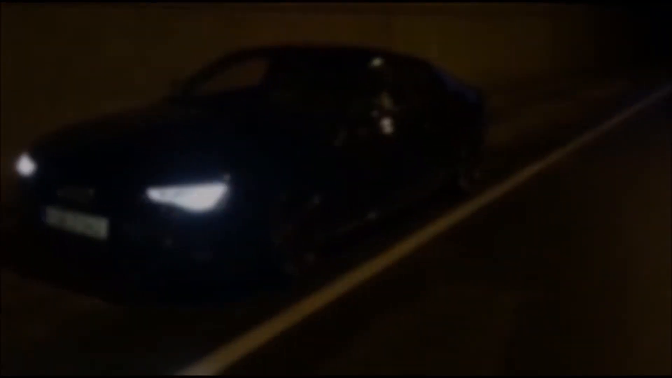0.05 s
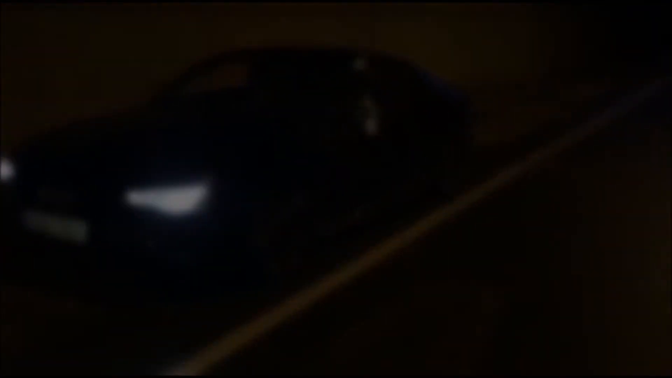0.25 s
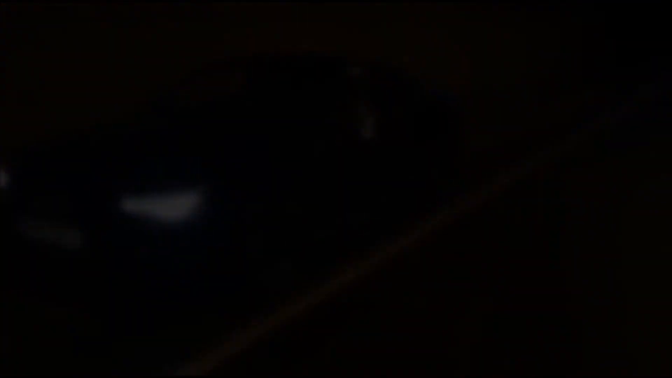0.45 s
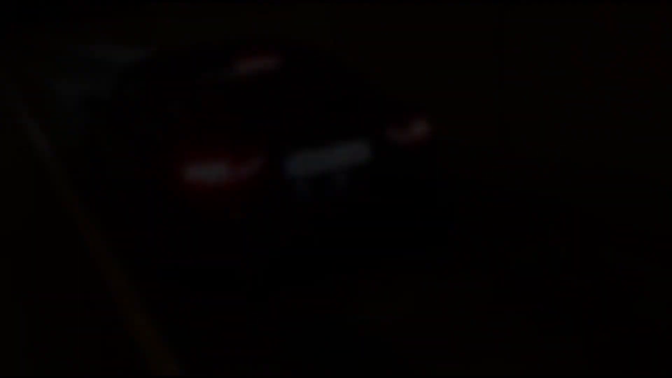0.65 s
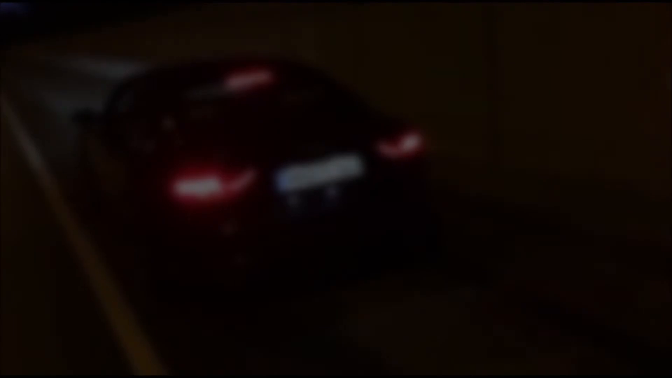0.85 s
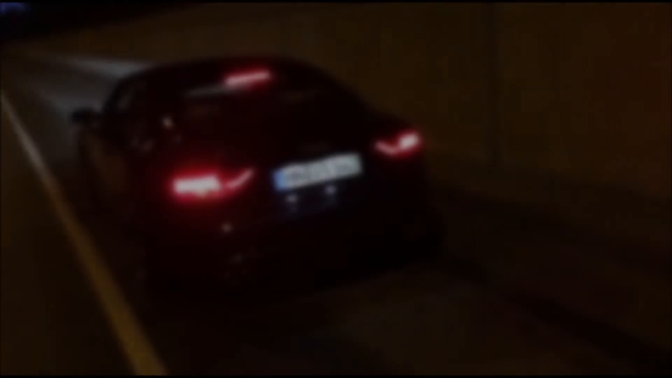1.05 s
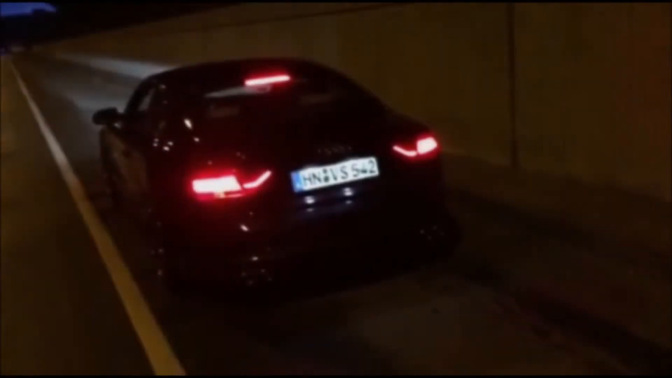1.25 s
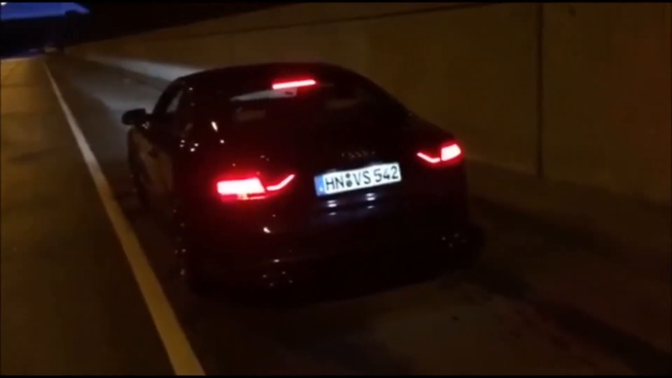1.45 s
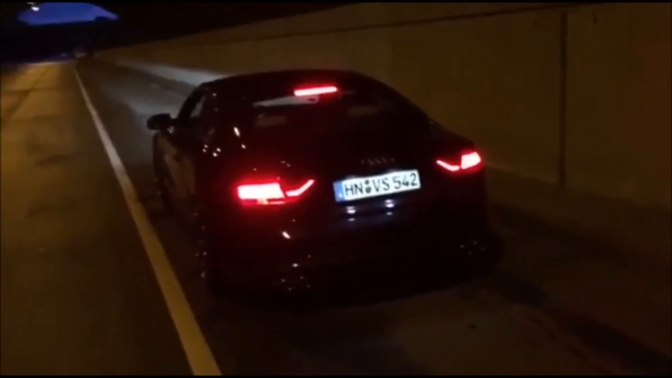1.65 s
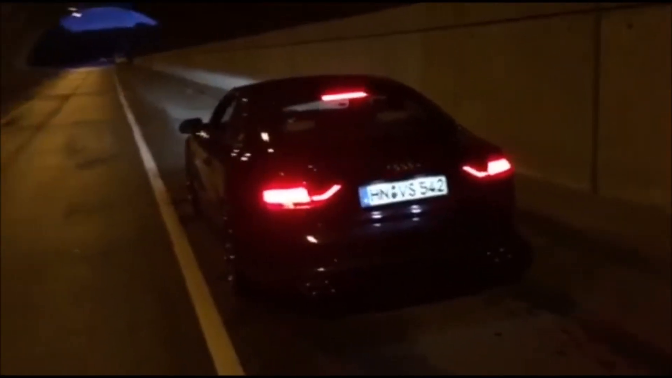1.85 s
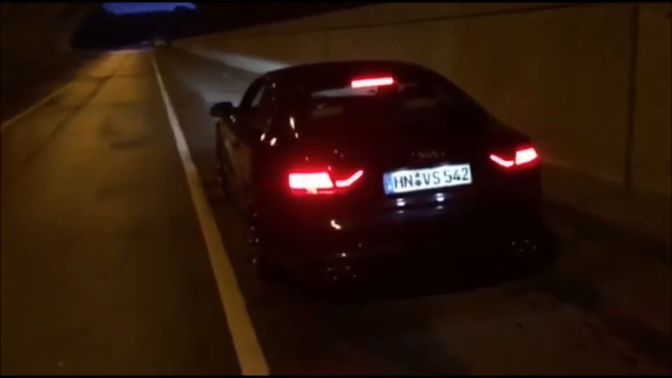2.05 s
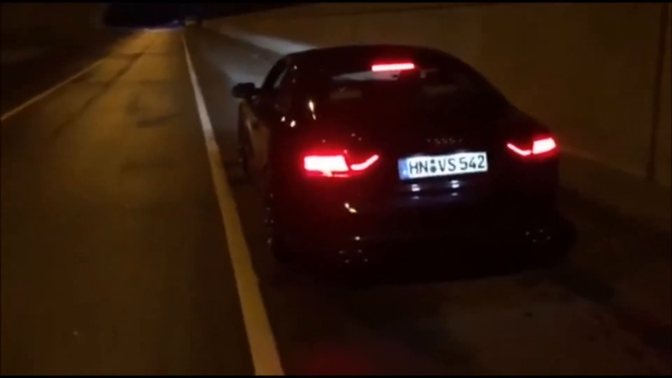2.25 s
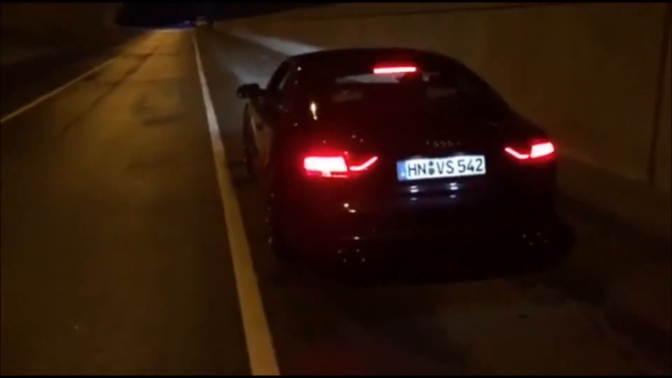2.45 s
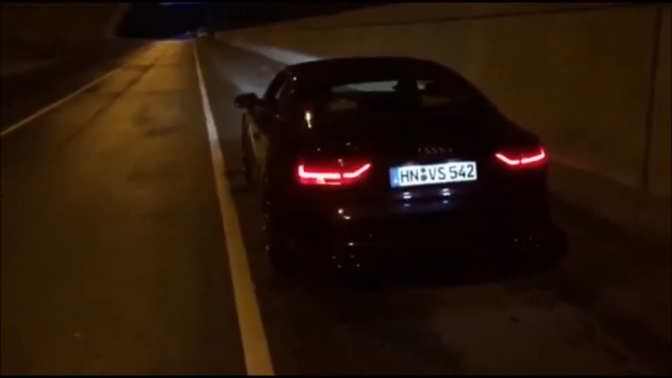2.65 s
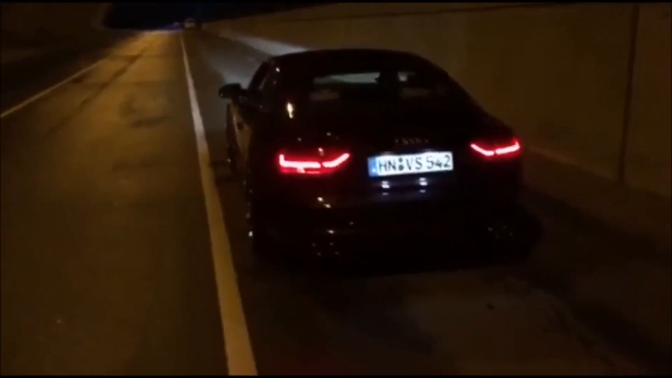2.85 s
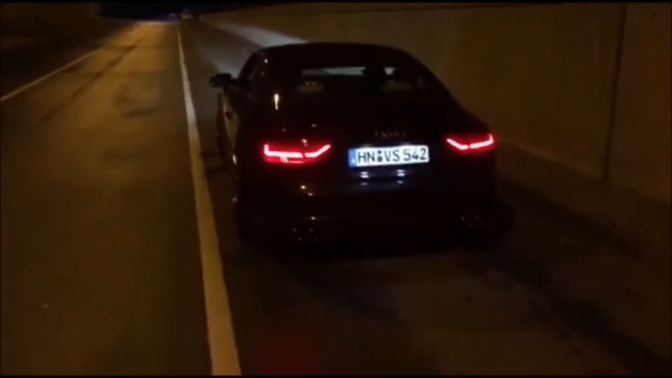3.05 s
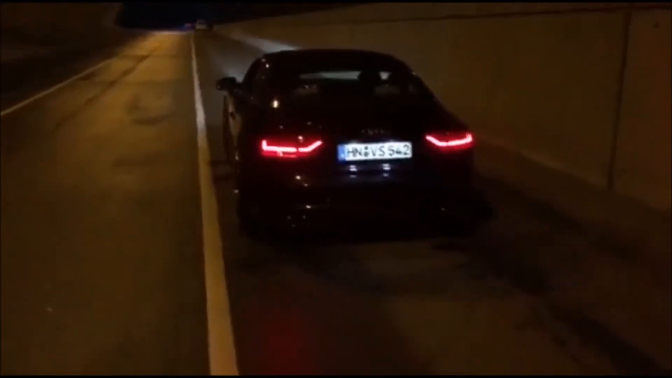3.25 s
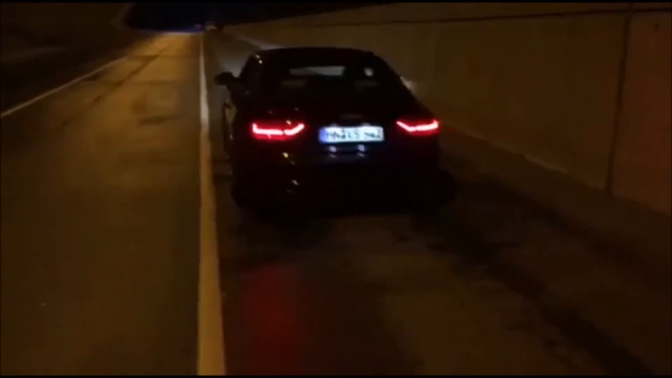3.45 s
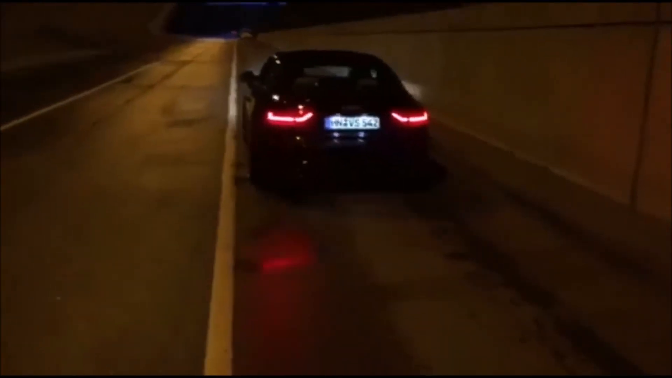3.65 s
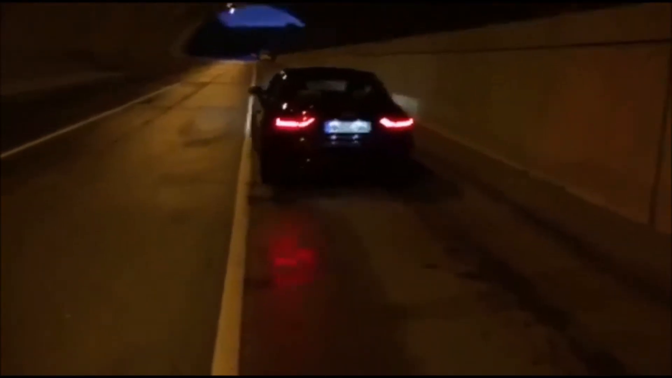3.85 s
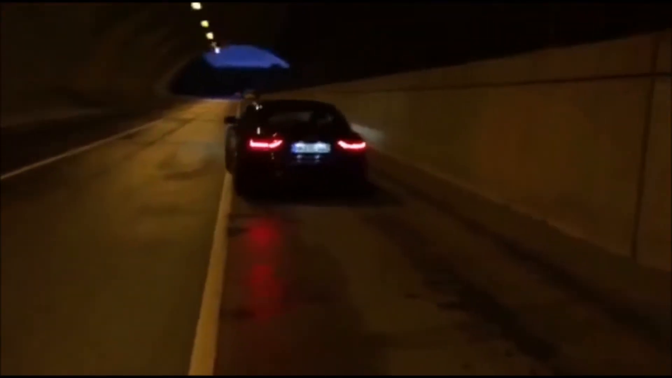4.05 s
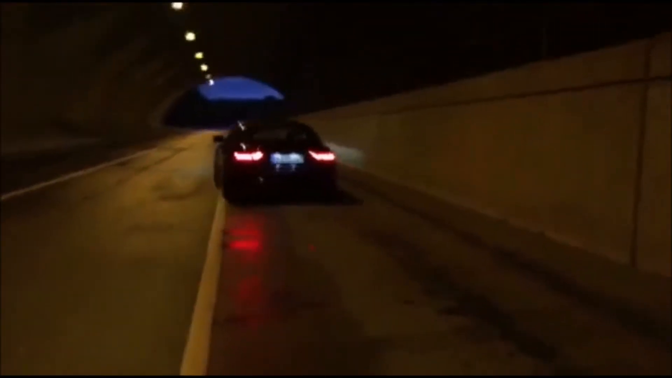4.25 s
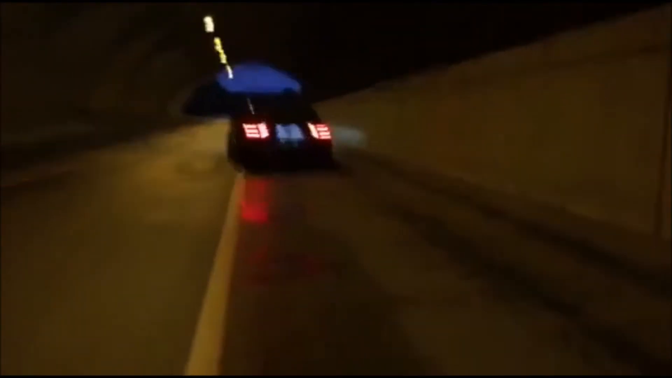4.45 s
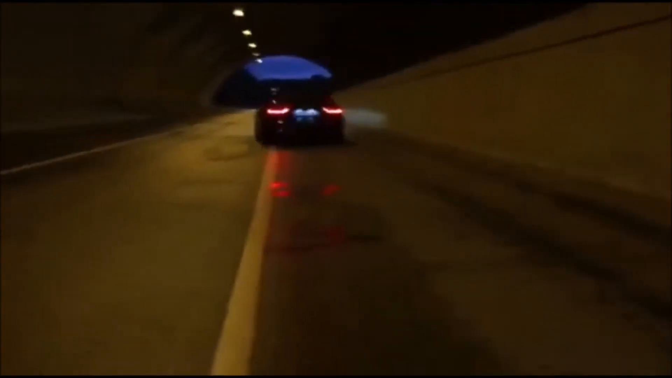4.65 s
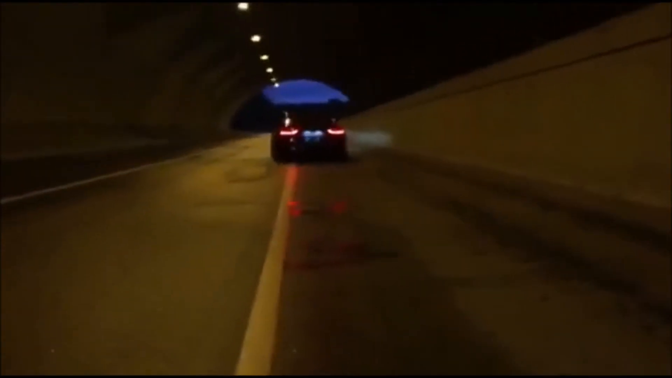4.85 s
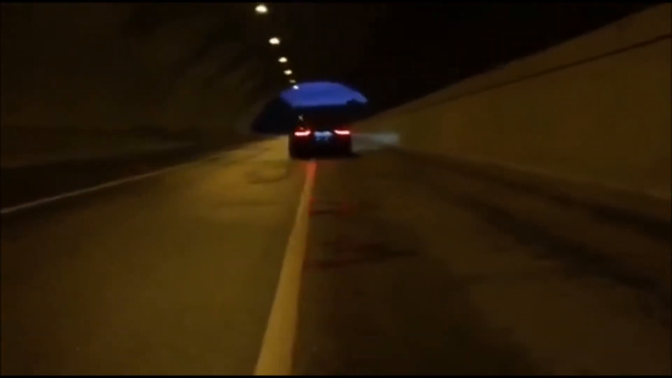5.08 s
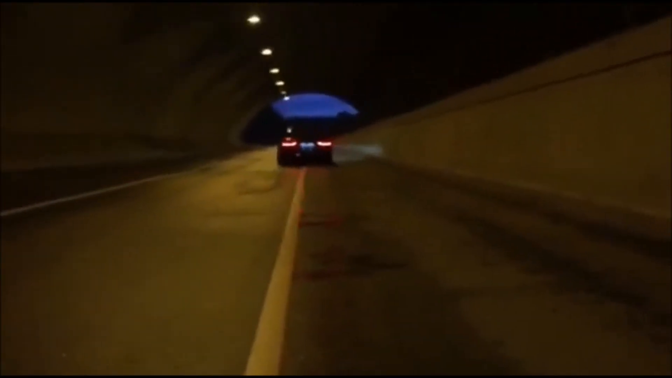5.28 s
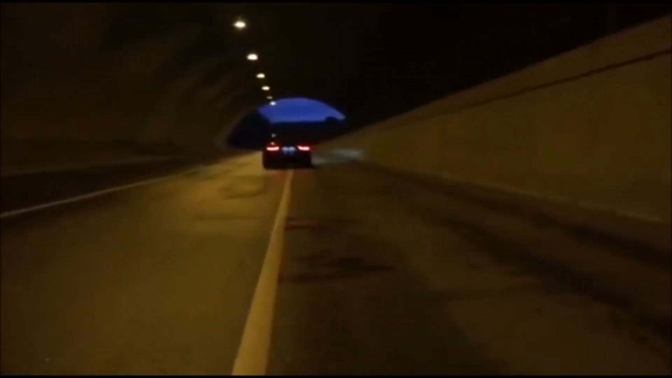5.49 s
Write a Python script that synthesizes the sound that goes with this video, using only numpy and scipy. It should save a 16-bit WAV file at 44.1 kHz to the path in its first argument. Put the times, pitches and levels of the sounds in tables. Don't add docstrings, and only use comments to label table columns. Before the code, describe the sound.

Quiet lumpy idle of a big engine, faint metallic ticking, then a sudden loud exhaust bellow accelerating hard down a concrete tunnel.

```python
import sys
import numpy as np
from scipy import signal
from scipy.fft import rfft, irfft, next_fast_len
from scipy.io import wavfile
from scipy.ndimage import uniform_filter1d

SR = 44100
rng = np.random.default_rng(int(sys.argv[2]) if len(sys.argv) > 2 else 0)


def makeup_ratio(level_db):
    decades = np.asarray(level_db, float) / 20
    return 10 ** decades


def persist_wave(psi):
    counts = np.round(np.clip(psi, -1, 1) * 32767).astype(np.int16)
    wavfile.write(sys.argv[1], SR, np.atleast_2d(counts).T)


N = 243431
T = np.arange(N) / SR

# (time [s], rate [Hz])
CYCLE_RATE = [(0.0, 5.38), (0.9, 5.38), (1.2, 5.46), (1.8, 5.28), (2.4, 5.22), (2.8, 5.4), (3.1, 15.1),
              (3.2, 17.76), (3.6, 22.45), (3.95, 26.0), (4.2, 30.6), (4.3, 32.0), (4.48, 33.0),
              (4.6, 35.93), (4.7, 37.87), (4.8, 39.1), (5.0, 42.85), (5.52, 51.1)]
# (time [s], level [dB])
EXHAUST_LEVEL = [(0, -38), (.4, -42), (.85, -40), (1.05, -44), (1.25, -29.5), (1.75, -30.5), (2.2, -28),
                 (2.69, -25), (2.81, -26.5), (2.89, -11.5), (3., -8), (3.3, -13), (3.6, -11), (3.95, -14),
                 (4.2, -11), (4.5, -15), (5.1, -12.5), (5.52, -13.5)]

IDLE_ORDERS = [8, 11, 12, 13, 15, 16, 17, 18, 19, 21, 24, 29, 37, 40, 41, 42]
IDLE_ORDER_DB = [12, 11.8, 4.1, 23.3, 10, 26.5, 6.7, 9.5, 11, 13, 15.7, 7.1, 13.4, 19.7, 6.7, 6]
LOAD_ORDERS = [1, 2, 4, 5, 6, 7, 8, 9, 10, 12, 13, 14, 16, 17, 19, 20, 22, 23, 24, 25, 26, 27, 29, 30, 34]
LOW_REVS_DB = [-8, -26, -5, 8, 6.5, -3.5, 12.5, 5, -11, 0, 13, 9, 1, 14, 10.5, -3.5, 8.5, 7, 6, 10, 3.5, -2,
               3, 6, -5]
HIGH_REVS_DB = [-14.5, 2, 1, 2.5, 4, -8.5, 13, 4, -2, 2, 11.5, 14.5, 7.5, 13, 4, 3.5, 7.5, -1, -9, 4, 3.5,
                -1, 6.5, -3, 4.5]
TOP_REVS_DB = [-12, 4, 4.5, 7.5, 6.5, -7.5, 9.5, 8.5, 4, 5, 10, 15, 0, 9.5, 8, -4, 2, -3.5, -1, -2, 5, -3,
               -3, -6, -2.5]
# (frequency [Hz], level [dB])
PIPE = [(20, -48.5), (50, -30.5), (85, -32), (130, -26), (210, -33), (260, -36.5), (310, -40), (380, -43),
        (520, -39), (690, -34), (780, -38.5), (950, -30.5), (1250, -40), (1650, -40.5), (2300, -51.5)]
# (frequency [Hz], width [Hz], level [dB])
TAIL_MODES = [(86.5, 14, 10.5), (209, 29, 5), (494, 30, 7)]
LOUD_FIRINGS = [
    (0, 1.),
    (.125, .65),
    (.36, .45),
    (.5, .35),
    (.75, .75),
]
IDLE_FIRINGS = [
    (.083, .2),
    (.188, .68),
    (.514, .43),
    (.78, .87),
    (.871, .63),
]

CYLINDER_DB = [-21, -24, -22, -20, -25, -18, -11, -19]
# (frequency [Hz], density [dB per Hz])
RUMBLE = [(15, -60.5), (25, -29.5), (59, 0.5), (92, -7), (157, -12), (220, -14), (320, -41), (420, -60.5),
          (700, -120)]
# (frequency [Hz], density [dB per Hz])
GAS_FRONT = [(150, -23), (250, 2), (289, -2.5), (387, -10), (583, -1.5), (878, -12), (1210, -13.5),
             (1320, -17.5), (1930, -17), (2590, -24.5), (7510, -40), (8200, -48), (10700, -82),
             (18000, -120)]
# (frequency [Hz], density [dB per Hz])
GAS_IDLE = [(150, -23.5), (250, 13), (387, -1), (504, 10.5), (737, -1.5), (1050, 1), (1320, -11),
            (1670, -13), (1960, -17.5), (3320, -28), (3840, -32.5), (4380, -31), (8200, -40.5),
            (10700, -62.5), (18000, -120)]
# (frequency [Hz], density [dB per Hz])
GAS_NEAR = [(150, -20.5), (250, -19), (335, 18), (387, -9), (550, 18), (793, -3.5), (987, -5),
            (1230, -22.5), (1530, -26.5), (1900, -35), (2250, -34), (3130, -38.5), (6680, -49), (8200, -59),
            (10700, -77.5), (18000, -120)]
# (frequency [Hz], density [dB per Hz])
GAS_FAR = [(150, -9.5), (250, -17), (423, -28.5), (637, -2), (759, -44), (972, -2.5), (1250, -19),
           (1640, -16), (1880, -21.5), (2300, -18.5), (3520, -24.5), (7190, -30.5), (8200, -40),
           (10700, -89.5), (18000, -120)]

# (time [s], peak level [dB])
CRACKS = [(2.8835, -40), (2.9285, -35), (2.9537, -24), (2.985, -26), (3.0173, -25), (3.044, -29),
          (3.0892, -23), (3.2085, -29.5), (3.2625, -30), (3.2933, -31.5), (3.3134, -29.5), (3.3668, -26.5),
          (3.416, -21), (3.445, -30.5), (3.465, -14.5), (3.4938, -35), (3.512, -16), (3.541, -39.5),
          (3.5584, -21.5), (3.648, -20.5), (3.69, -17.5), (3.7325, -19), (3.7738, -19.5), (3.8146, -27.5),
          (3.8554, -26), (3.8963, -43.5), (3.9385, -38.5), (3.977, -28), (4.0157, -22.5), (4.0476, -36),
          (4.11, -40), (4.151, -17.5), (4.178, -13.5), (4.2156, -24), (4.2485, -12), (4.2823, -8),
          (4.3697, -16), (4.551, -31), (4.69, -24), (4.7082, -11.5), (4.9431, -29), (4.9666, -22),
          (5.038, -16), (5.1265, -13), (5.1717, -9), (5.2142, -7.5), (5.2354, -9.5), (5.259, -9),
          (5.2802, -5), (5.3215, -16), (5.344, -21)]
# (time [s], peak level [dB])
BITES = [(2.8867, -21), (2.8942, -22.5), (2.9866, -13), (2.9961, -12), (3.1275, -8.5), (3.1511, -9),
         (3.2088, -21), (3.2639, -13.5), (3.283, -10), (3.4436, -10.5), (3.449, -4), (3.477, -11),
         (3.524, -15.5), (3.5698, -8.5), (3.6147, -10), (3.6488, -13), (3.6585, -2), (3.7017, -11),
         (3.7438, -5.5), (3.7852, -1.5), (3.7916, -3.5), (3.8259, -5.5), (3.8405, -6), (3.8661, -18.5),
         (3.9195, -4.5), (3.9356, -18), (3.9443, -9.5), (3.9958, -7), (4.0195, 0), (4.0559, 2),
         (4.1298, 1.5), (4.1381, -2.5), (4.1901, -3.5), (4.2255, -6), (4.2718, -14.5), (4.3441, -22),
         (4.4131, -10.5), (4.4546, -16.5), (4.4781, -8), (4.5042, -7), (4.5439, -0.5), (4.5576, 1),
         (4.7193, -0.5), (4.7749, -11.5), (4.7826, -12.5), (4.8228, -9), (4.8973, -2), (4.9216, -13.5),
         (4.9694, -16), (5.0295, -9.5), (5.0442, 3), (5.2175, -3.5), (5.2267, -5), (5.3236, -10.5),
         (5.4829, -8), (5.5115, -18)]

# (place [0-1 cycle], level [dB])
PUMP_STROKES = [
    (0.165, -5),
    (0.51, -4.5),
    (0.801, -11.5),
]
# (frequency [Hz], width [Hz], level [dB])
PUMP_RING = [(3340, 450, 0), (4450, 750, 0), (6400, 600, -14)]
# (time [s], level [dB])
PUMP_LEVEL = [
    (0, -80),
    (1., -88),
    (1.4, -79.5),
    (2.7, -73.5),
    (3., -61),
]
# (time [s], peak level [dB], ring [Hz])
PUMP_KNOCKS = [(1.1407, -65, 3560), (1.21, -59, 3340), (1.2809, -72, 3560), (1.3293, -69, 4230),
               (1.397, -62, 4620), (1.5149, -59, 4180), (1.5807, -56, 4430), (1.697, -61, 3440),
               (1.767, -53.5, 4330), (1.887, -58.5, 3350), (1.9589, -53, 3440), (2.0292, -64.5, 3260),
               (2.0766, -55, 3350), (2.1465, -63, 3620), (2.1988, -70, 3300), (2.2727, -57.5, 3200),
               (2.338, -59, 4230), (2.4104, -55, 2920), (2.533, -54, 3300), (2.6014, -56.5, 4200),
               (2.6528, -51, 3970), (2.7177, -64, 4220)]

# (frequency [Hz], time to fall 60 dB [s])
TUNNEL = [(60, 1.5), (250, 2.9), (1000, 1.6), (3000, 0.91), (8000, 0.12)]
# (time [s], lost above [Hz])
TREBLE_GAPS = [
    (3.235, 3400),
    (4.05, 7000),
    (4.62, 4500),
    (4.7, 6000),
    (4.89, 5000),
]

TOP_ORDER = 56
FIRST_FIRING = .09
LEAVE_S = 2.24


def evened(x):
    return x / np.sqrt(np.mean(x ** 2) + 1e-20)


def ramp(x, start, span):
    return np.clip((x - start) / span, 0, 1)


def read(points, hz):
    f, value = np.transpose(points)
    return np.interp(np.log(hz + 1), np.log(f + 1), value)


def curve(rows, t=T):
    times, values = np.transpose(rows)
    return np.interp(t, times, values)


def above(hz, edge_hz):
    return 1 / (1 + (edge_hz / (hz + 1e-9)) ** 12)


def coloured(x, gain):
    size = next_fast_len(N)
    return irfft(rfft(x, size) * gain(np.fft.rfftfreq(size, 1 / SR)), size)[:N]


def smoothed_noise(shape, size):
    return uniform_filter1d(uniform_filter1d(rng.standard_normal(shape), size), size)


def strokes(turns, place):
    count = np.floor(turns - place)
    return np.diff(count, prepend=count[0]) > 0


def throttle(t):
    return ramp(curve(CYCLE_RATE, t), 5.6, 2.8)


def reach(t):
    return ramp(curve(CYCLE_RATE, t), 7, 10)


def blur_db(behind_db, front_db, far_db):
    return behind_db + front_db * ramp(T, 1.41, -0.29) + far_db * ramp(T, LEAVE_S, 1.58)


def bands_db(t):
    level, speed = curve(EXHAUST_LEVEL, t), curve(CYCLE_RATE, t)
    revs = speed / 50
    boom = level - 8.5 * ramp(revs, 0.32, 0.4)
    bark = level - 13 + 11.5 * ramp(revs, .2, .7 - .2)
    rasp = np.maximum(level, -15) - 26 + 15 * ramp(revs, .2, .71 - .2)
    calm = np.clip(level + 42, 0, 17)
    idle_bark, idle_rasp = -58.5 + 0.25 * calm, -67.5 + 0.5 * calm
    opened = ramp(speed, 6.3, 4.37)
    pedal = ramp(t, 2.73, 0.24)
    return boom, opened * bark + (1 - opened) * idle_bark, pedal * rasp + (1 - pedal) * idle_rasp


def order_db(marked, marked_db, slope_db, under_db):
    k = np.arange(1, TOP_ORDER + 1)
    out = -2.5 + slope_db * np.maximum(k - 32, 0) + under_db * (k < len(CYLINDER_DB))
    out[np.array(marked) - 1] = marked_db
    return out[:, None]


def beats(firings, k):
    return np.angle(sum(g * np.exp(-2j * np.pi * k * p) for p, g in firings)) / (2 * np.pi)


def resonance(hz, centre_hz, width_hz, power):
    return 1 / (1 + (2 * (hz - centre_hz) / width_hz) ** power)


def loaded_order_db(hz, k, t):
    speed, slope_db = curve(CYCLE_RATE, t), -0.202
    fast, top = ramp(speed, 25, 7), ramp(speed, 34, 8)
    low_db, high_db, top_db = (order_db(LOAD_ORDERS, db, slope_db, 0)
                               for db in (LOW_REVS_DB, HIGH_REVS_DB, TOP_REVS_DB))
    out = (1 - fast) * low_db + (fast - top) * high_db + top * top_db + read(PIPE, hz) + 35
    out += (1 - fast) * sum(db * resonance(hz, f, width, 2) for f, width, db in TAIL_MODES)
    out += (k == len(CYLINDER_DB)) * (1 - reach(t)) * 11 * resonance(hz, 98, 46, 4)
    return out + (1 - reach(t)) ** 3 * 12 * resonance(hz, 88, 34, 4)


def orders(turns, wander_db=1.5, trim_db=-1.3):
    t, k = T[::64], np.arange(1, TOP_ORDER + 1)[:, None]
    load, hz = throttle(t), k * curve(CYCLE_RATE, t)
    idle_db = order_db(IDLE_ORDERS, IDLE_ORDER_DB, slope_db=3 * -0.202, under_db=-11)
    power = makeup_ratio((1 - load) * idle_db + load * loaded_order_db(hz, k, t)) ** 2

    high = above(hz, edge_hz=236)
    boom_db, bark_db, _ = bands_db(t)
    boom = makeup_ratio(boom_db) ** 2 / (power * (1 - high)).sum(0)
    bark = makeup_ratio(bark_db) ** 2 * reach(t) / (power * high).sum(0)
    height = np.sqrt(2 * power * (boom * (1 - high) + bark * high))
    height = height * makeup_ratio(trim_db - 0.5 * ramp(t, 1.15, -0.22))

    rough = load * np.clip(hz / 500, .15, 1.3)
    chance, drift = smoothed_noise((2, *hz.shape), 26)
    swell_db = (2.1 + wander_db * rough) * 1.25 * np.tanh(evened(chance))
    height = height * makeup_ratio(swell_db - .5 * wander_db * rough)

    scatter = .05 * (1 + (14 / k) ** 2) * rng.standard_normal(k.shape)
    start = (1 - load) * beats(IDLE_FIRINGS, k) + load * (beats(LOUD_FIRINGS, k) + scatter)
    start = start + .014 * rough * evened(drift)
    place, slow_t = turns[::6] - FIRST_FIRING, T[::6]
    slow = 0
    for n, h, p in zip(k[:, 0], height, start):
        phase = 2 * np.pi * (n * place + np.interp(slow_t, t, p))
        slow = slow + np.interp(slow_t, t, h) * np.cos(phase)
    return -signal.resample_poly(slow, up=6, down=1)[:N]


def gusts(depth_db=1.0, length_s=0.06):
    return depth_db * evened(smoothed_noise(N, round(length_s * SR)))


def gas(turns, spread_db=3., puff_s=.0009, steady=.26):
    kicks = sum(makeup_ratio(db) * strokes(turns, FIRST_FIRING + n / len(CYLINDER_DB))
                for n, db in enumerate(CYLINDER_DB))
    kicks = kicks * makeup_ratio(spread_db * rng.standard_normal(N)) * throttle(T)
    puffs = signal.lfilter([1], [1, -np.exp(-1 / (puff_s * SR))], kicks)
    drive = (steady + 2.4 * puffs) * rng.standard_normal(N)
    drive = drive / np.sqrt(uniform_filter1d(drive ** 2, size=5000))

    front, far, load = ramp(T, 1.15, -0.55), ramp(T, 3.7, 1.46), throttle(T)
    shares = front, (1 - front) * (1 - load), load * (1 - far), load * far
    loose_db = blur_db(behind_db=-24, front_db=18, far_db=7)
    boom_db, bark_db, rasp_db = bands_db(T)
    bark, rasp = makeup_ratio(bark_db + reach(T) * loose_db), makeup_ratio(rasp_db + load * gusts())
    out = makeup_ratio(boom_db + loose_db) * evened(coloured(drive, lambda f: makeup_ratio(read(RUMBLE, f))))
    for share, colour in zip(shares, (GAS_FRONT, GAS_IDLE, GAS_NEAR, GAS_FAR)):
        low = coloured(drive, lambda f: makeup_ratio(read(colour, f)) * np.sqrt(1 - above(f, 1400)))
        high = coloured(drive, lambda f: makeup_ratio(read(colour, f)) * np.sqrt(above(f, 1400)))
        out += share * (bark * evened(low) + rasp * evened(high))
    return out


def cracks(ring_s=.0004, steep_s=.0001, wide=.6, second_gain=.6):
    out, t = np.zeros(N + 1200), np.arange(600) / SR
    band = signal.butter(2, [1800, 7600], "band", fs=SR)
    splash = signal.lfilter(*band, rng.standard_normal((len(CRACKS), 600)))
    pitches = 3300 + 300 * rng.standard_normal(len(CRACKS))
    for (s, db), hz, noise in zip(CRACKS, pitches, splash):
        fast = ramp(s, 3.8, .3)
        length = (1 - fast) * ring_s + fast * steep_s
        ring = (t / length) * np.exp(1 - t / length) * np.sin(2 * np.pi * hz * (1 + .3 * fast) * t)
        front = makeup_ratio(db - 1.5) * ((wide + .2 * fast) * noise * np.exp(-t / .0016) - ring)
        second_s = .0065 / max(s - 2.92, .55)
        for arrival_s, gain in ((s, 1), (s + second_s, second_gain)):
            at = round(arrival_s * SR)
            out[at:at + 600] += gain * front
    return out[:N]


def bites(ring_s=0.0027, trim_db=-2.5):
    out, t = np.zeros(N + 1500), np.arange(1500) / SR
    for s, db in BITES:
        at, hz = round(s * SR), 544 + 55 * (s - LEAVE_S)
        out[at:at + len(t)] -= makeup_ratio(db + trim_db) * np.exp(-t / ring_s) * np.sin(2 * np.pi * hz * t)
    return out[:N]


def pump(turns, stroke_s=0.0087):
    kicks = sum(makeup_ratio(db) * strokes(turns, place) for place, db in PUMP_STROKES)
    kicks = kicks * makeup_ratio(2.5 * rng.standard_normal(N)) * (1 - throttle(T))
    burst = signal.lfilter([1], [1, -np.exp(-1 / (stroke_s * SR))], kicks) * rng.standard_normal(N)
    ring = coloured(burst, lambda f: sum(makeup_ratio(db) / np.hypot(1, 2 * (f - hz) / width) ** 2
                                         for hz, width, db in PUMP_RING))
    return makeup_ratio(curve(PUMP_LEVEL)) * evened(ring) * np.sqrt(.5)


def knocks(ring_s=0.021, width_hz=220, trim_db=-13.5, other_db=-5.0):
    out, t = np.zeros(N), np.arange(2600) / SR
    grit = smoothed_noise((len(PUMP_KNOCKS), 4, len(t)), round(SR / width_hz / 2))
    for (s, db, hz), (a, b, c, d) in zip(PUMP_KNOCKS, grit):
        turn = 2 * np.pi * hz * t
        other = 2 * np.pi * (3350 + 4300 - hz) * t
        ring = evened(a * np.cos(turn) + b * np.sin(turn))
        ring = ring + makeup_ratio(other_db) * evened(c * np.cos(other) + d * np.sin(other))
        envelope = np.minimum(t / .002, 1) * np.exp(-t / ring_s)
        out[round(s * SR):][:len(t)] += makeup_ratio(db + trim_db) * envelope * ring
    return out


def tunnel(x):
    taps = np.zeros(2 * SR)
    at = np.arange(460, 2 * SR - 20, 20)
    taps[at + rng.integers(0, 20, len(at))] = rng.choice([-1., 1.], len(at))
    hz, t, z = signal.stft(taps, SR, nperseg=512)
    tail = signal.istft(z * makeup_ratio(-60 * t / read(TUNNEL, hz)[:, None]), SR, nperseg=512)[1]
    return signal.fftconvolve(x, tail / np.linalg.norm(tail))[:N]


def scene():
    turns = np.cumsum(curve(CYCLE_RATE)) / SR
    car = orders(turns) + gas(turns) + cracks() + bites() + pump(turns) + knocks()
    tail_db = blur_db(behind_db=-22, front_db=12, far_db=6.5)
    return (car + makeup_ratio(tail_db) * tunnel(car))[None]


def thinned_treble(x, from_hz=1800, under_db=-3.2, loss_db=-22, contrast=.5):
    hz, t, z = signal.stft(x, SR, nperseg=2048)
    band = uniform_filter1d(uniform_filter1d(abs(z) ** 2, size=5, axis=1), size=2, axis=2)
    around = uniform_filter1d(uniform_filter1d(band, size=60, axis=1), size=2, axis=2)
    over_db = 10 * np.log10(abs(band / around) + 1e-9)
    weak = np.clip(under_db - over_db, 0, 1) * above(hz, from_hz)[:, None]
    dice = rng.random((len(t), 65)).T.repeat(16, axis=0)[:len(hz)]
    gaps = sum((abs(t - s) < .02) * (hz[:, None] > f) for s, f in TREBLE_GAPS)
    odds = .03 * (hz > 3000)[:, None] + .4 * (hz > 7700)[:, None] + .65 * gaps
    sharp_db = contrast * (over_db - 1.1) * above(hz, from_hz / 2)[:, None]
    kept = z * makeup_ratio(sharp_db + loss_db * np.maximum(weak, dice < odds))
    return signal.istft(kept, SR, nperseg=2048)[1][:, :N]


def low_pass(x):
    return signal.sosfilt(signal.butter(12, 8540, fs=SR, output="sos"), x)


def record(dry):
    soft = thinned_treble(1.156 * np.tanh(dry / 1.143))
    band_limit = signal.firwin(401, 7990, window=("kaiser", 9), fs=SR)
    narrow = signal.oaconvolve(soft, band_limit[None], "same")
    return low_pass(narrow)


dry = scene()
out = record(dry)
persist_wave(out)
```